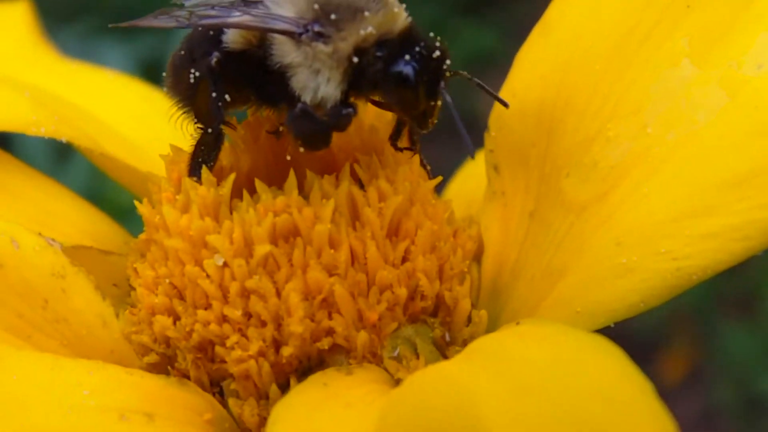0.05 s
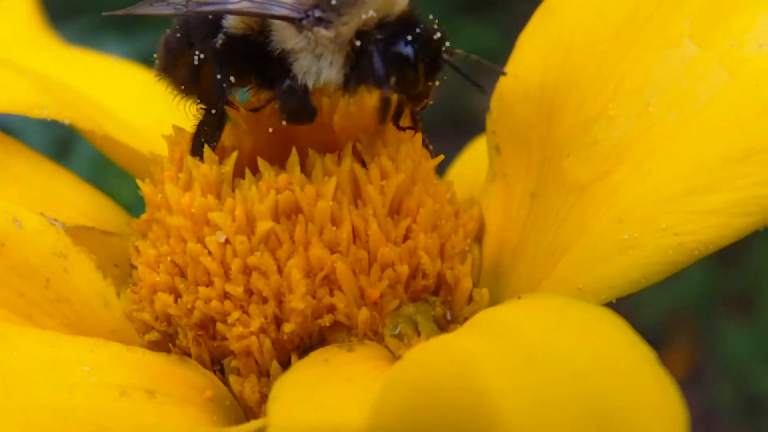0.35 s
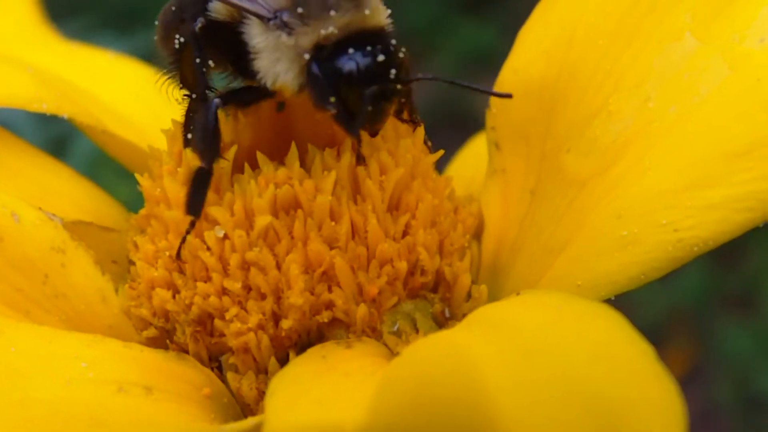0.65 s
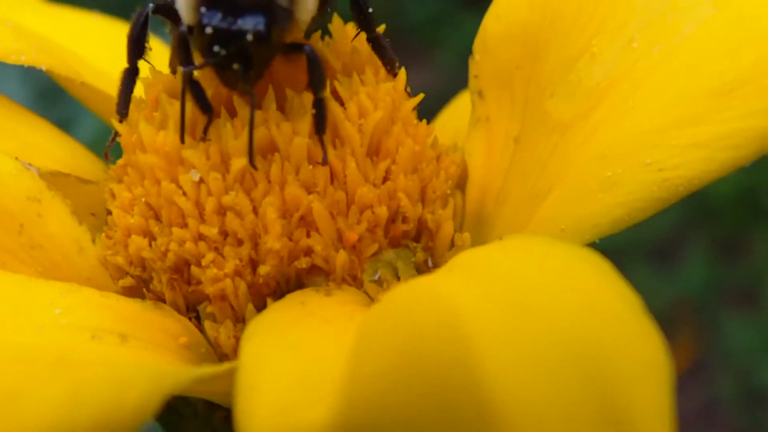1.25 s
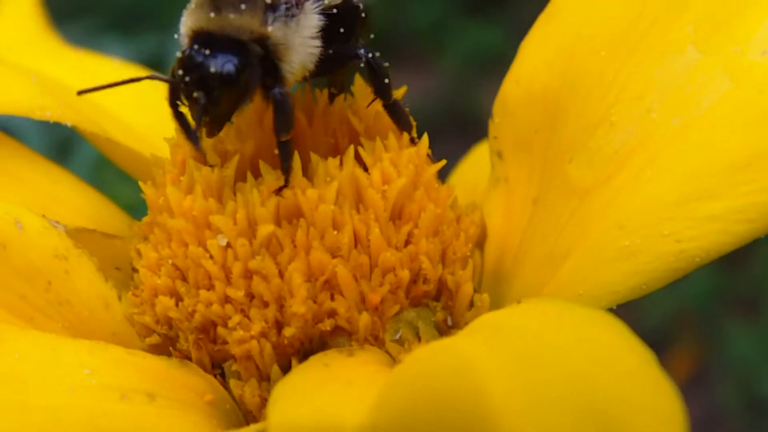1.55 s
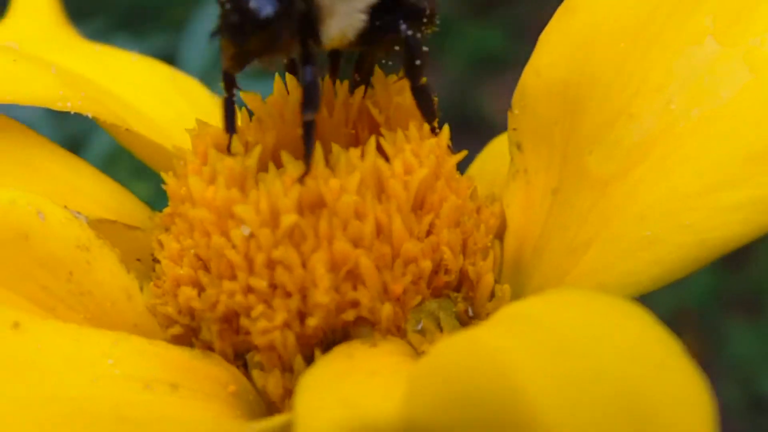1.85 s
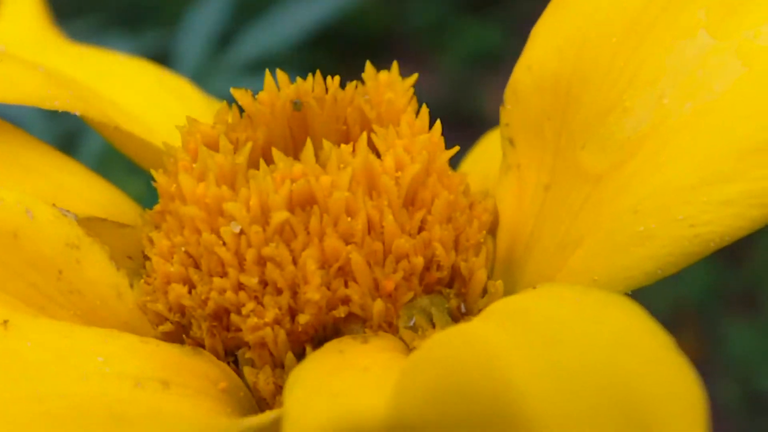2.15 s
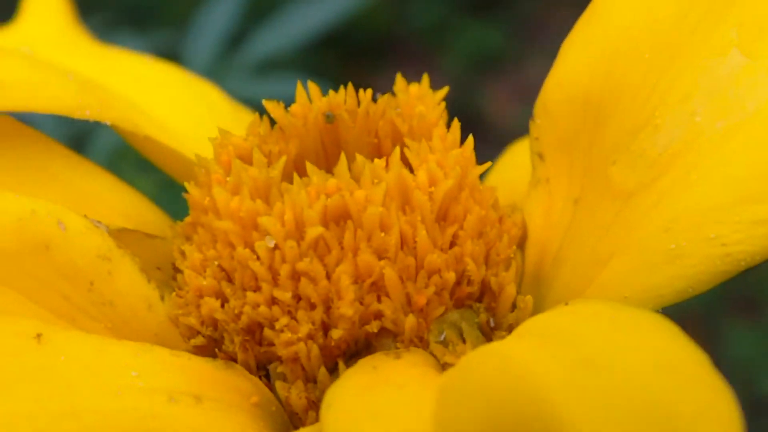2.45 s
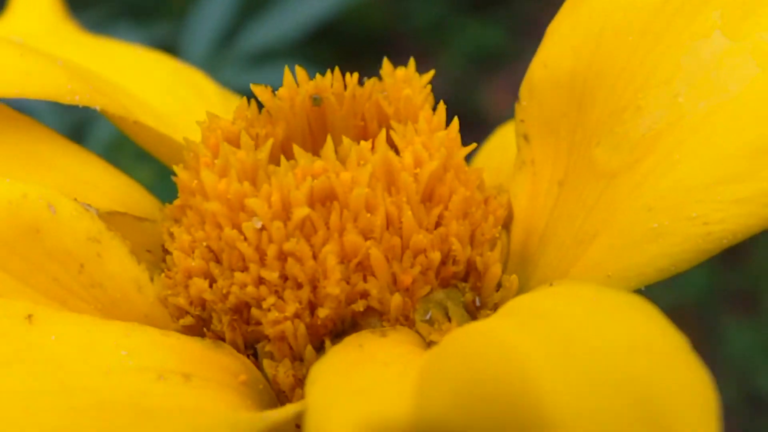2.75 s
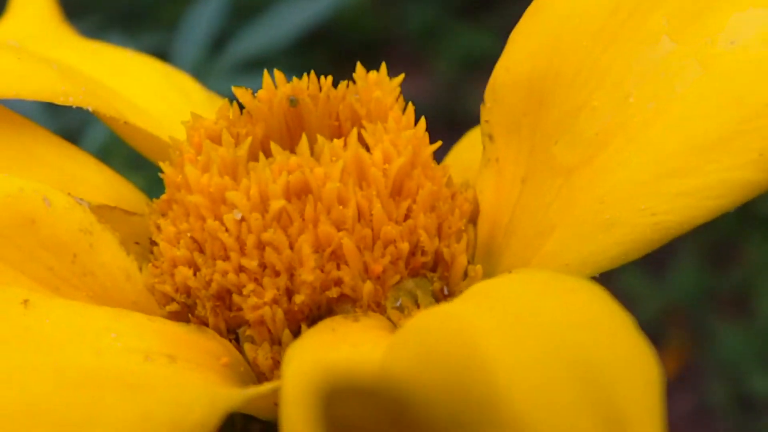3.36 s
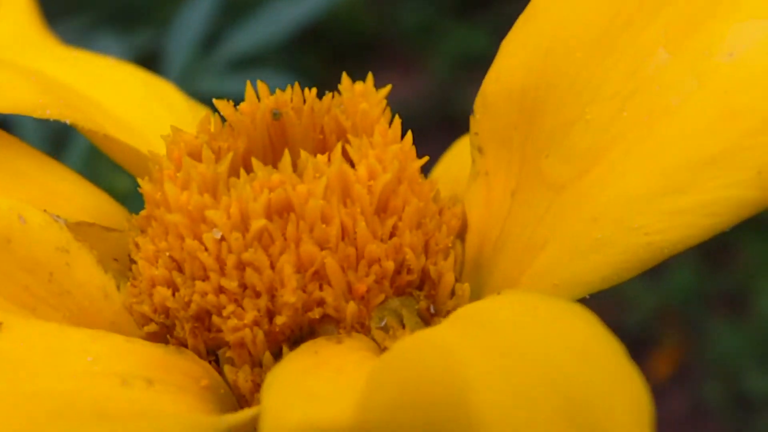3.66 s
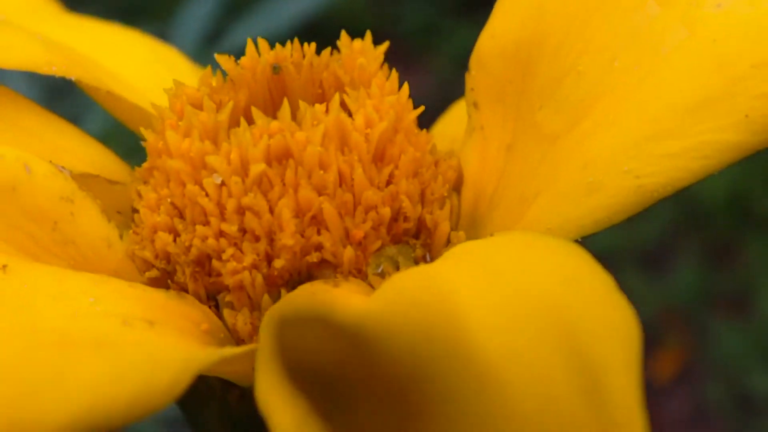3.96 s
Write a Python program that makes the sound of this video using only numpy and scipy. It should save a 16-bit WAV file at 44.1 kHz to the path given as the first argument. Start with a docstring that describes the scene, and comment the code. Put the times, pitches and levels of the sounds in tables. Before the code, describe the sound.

A bumblebee buzzes faintly close to the microphone, taking off from a flower halfway through, drifting away and swinging back. Throughout, crickets trill in the meadow over a soft hiss, with high katydid rasps and tiny distant bird pips.

```python
"""A bumblebee takes off from a flower close to the microphone, drifts away and swings back.
Its wingbeats make the buzz, and every stroke throws off a puff of hiss and a sharp snap.
In the summer meadow behind it, crickets trill, two katydids scrape their wings in buzzes
and ticks, and a far bird pips. Under it all lie a soft outdoor wash, a distant machine's
hum and the faint whine of the camera."""
import sys
import numpy as np
from scipy import signal
from scipy.fft import rfft, irfft
from scipy.io import wavfile
from scipy.ndimage import uniform_filter1d

SR = 44100
rng = np.random.default_rng(int(sys.argv[2]) if len(sys.argv) > 2 else 0)


def pcm_store(signal):
    """Save signal as 16-bit PCM."""
    levels = np.round(np.clip(np.atleast_2d(signal), -1, 1) * 32767)
    wavfile.write(sys.argv[1], SR, levels.astype(np.int16).T)


N = 176400
T = np.arange(N) / SR
HZ = np.fft.rfftfreq(N, 1 / SR)

# The bee's wingbeat. Each row: time in seconds, beats per second.
WINGBEAT = [(2.02, 161), (2.07, 171.5), (2.114, 180.7), (2.21, 170.1), (2.32, 170.6), (2.39, 174.3),
            (2.52, 169.3), (2.6, 169.7), (2.68, 161.8), (2.8, 173.4), (2.87, 164.8), (3.04, 167.9),
            (3.3, 165.8), (3.69, 167.1), (3.85, 164.5), (3.93, 163.8), (4, 165.2)]
def bumblebee():
    """Close to the microphone, one wingbeat drives the buzz, the hiss and the snaps."""
    beat_hz = curve(WINGBEAT) * (1 + .007 * drift(rate=50.5))
    cycles = np.cumsum(beat_hz) / SR
    return wing_buzz(cycles) + wing_hiss(cycles) + wing_snaps(cycles)


# The buzz at the microphone. Each row: time in seconds, level in dB.
BUZZ_LEVEL = [(2.03, -75), (2.07, -56), (2.11, -45.5), (2.22, -46.5), (2.33, -52.5), (2.42, -47),
              (2.6, -44), (2.7, -46), (2.76, -47.5), (2.81, -56), (2.98, -56), (3.15, -64), (3.45, -65),
              (3.65, -60), (3.72, -52.5), (3.83, -45), (3.92, -41), (4, -42.5)]
# Its overtones. Each row: multiple, then relative dB at take-off, flying off and coming back.
OVERTONES = [(1, -19, -16, -14), (2, -9, -9.5, 0), (3, -7, -4.5, -1), (4, -4, -9, -5), (5, 0, 0, -3.5),
             (6, -2, -9, -3.5), (7, -9, -7, -3), (8, -7, -6, -5), (9, -1, -4, -7), (10, -8, -11, -8),
             (11, -6, -10, -10), (12, -8, -13, -13), (13, -7, -15, -15), (14, -10, -14, -13)]
# The bee's turns, in seconds: start and end of turning away, start and end of turning back.
HEADING_S = [2.2, 2.42, 3.0, 3.7]
def wing_buzz(cycles):
    """Overtones of the wingbeat, whose balance shifts as the bee turns."""
    tone, power = 0, 0
    for k, (_, start_db, away_db, back_db) in enumerate(OVERTONES, 1):
        gain = amp(np.interp(T, HEADING_S, [start_db, away_db, away_db, back_db]))
        wander_db = np.interp(k, [1, len(OVERTONES)], [1.5, 3.6]) * drift(rate=17)
        tone += gain * amp(wander_db) * np.sin(2 * np.pi * (k * cycles + rng.random()))
        power += gain ** 2 / 2
    airborne = T > BUZZ_LEVEL[0][0]
    return tone / np.sqrt(power) * amp(curve(BUZZ_LEVEL)) * airborne * pan(left_db=-1.55)


# Air off the wings, close up. Each row: time in seconds, level in dB.
HISS_LEVEL = [(1.98, -70), (2.05, -45), (2.2, -44), (2.33, -43), (2.45, -42), (2.68, -43), (2.8, -43),
              (3.0, -45), (3.25, -46.5), (3.7, -45), (3.92, -43), (4, -44)]
# Its colour. Each row: frequency in Hz, relative level in dB.
HISS_COLOUR = [(20, -29), (300, -16), (1200, -8), (2500, 0), (4000, 0.5), (6000, 0.5), (8500, 2.5),
               (10500, 2.5), (12500, -16.5), (15500, -25)]
# Left-right likeness of hiss and wash: nearly mono in the mids, wide in the treble.
# Each row: frequency in Hz, likeness from 0 to 1.
LIKENESS = [(30, .97), (500, .94), (900, .97), (1400, .997), (1900, .9999), (3200, .9999), (4000, .98),
            (5500, .9), (8500, .75), (10500, .35), (13000, .1)]
def wing_hiss(cycles):
    """Each stroke and back stroke pushes out a puff of air."""
    puffs = strokes(cycles, width=.094, back=1, lag=.61, bed=1)
    return noise(amp(spectrum(HISS_COLOUR)), spectrum(LIKENESS), puffs) * amp(curve(HISS_LEVEL))


# Wing snaps, left of centre. Each row: time in seconds, level in dB.
SNAP_LEVEL = [(2.0, -75), (2.15, -49), (2.45, -45.5), (2.56, -41.5), (2.7, -39), (2.78, -46), (3.2, -47),
              (3.75, -48.5), (3.92, -42), (4, -46)]
def wing_snaps(cycles):
    """A sharp snap on each beat, heard when the wings face the microphone."""
    treble = noise(bell(HZ, 11600, width=1700), alike=.21)
    snaps = strokes(cycles, width=.13, back=.3, lag=.48, bed=.11)
    return treble * snaps * amp(curve(SNAP_LEVEL)) * pan(left_db=2.5)


# The cricket chorus in the meadow. Each row: frequency in Hz, relative level in dB.
TRILL_COLOUR = [(5000, -100), (6500, -31), (6950, -17), (7250, -3), (7340, -8), (7430, -1), (7530, 1),
                (7650, 2), (7760, -12), (7880, -39), (8050, -17), (8500, -37), (9000, -100)]
# Clear notes of the nearest crickets. Each row: pitch in Hz, level in dB.
CRICKET_NOTES = [(7425, -47), (7642, -44.5)]
def crickets(trill_hz=45.1):
    """A shrill pulsing trill with clear notes in it, a little to the left."""
    cycles = np.cumsum(trill_hz * (1 + .0022 * drift(rate=2))) / SR
    pulses = strokes(cycles, width=.083, back=.43, lag=.28, bed=1)
    chorus = noise(amp(spectrum(TRILL_COLOUR)), alike=.79, pulse=pulses)
    chorus *= amp(-37 + .02 * drift(rate=17))
    notes = pulses * sum(amp(db) * wavering(hz, waver_hz=24) for hz, db in CRICKET_NOTES)
    return (chorus + notes) * pan(left_db=1.8)


# One cricket farther off. Each row: middle of the chirp in seconds, level in dB.
CHIRPS = [(.2, -47), (.47, -50), (.73, -49), (1.04, -47.5), (1.34, -46.5), (1.7, -47.5), (1.97, -48),
          (2.25, -50), (2.53, -49), (2.8, -49.5), (3.1, -48), (3.42, -48), (3.76, -48)]
def far_cricket():
    """Soft, regular chirps pitched below the chorus."""
    level = sum(amp(db) * bell(T, s, width=.09) for s, db in CHIRPS)
    return noise(bell(HZ, 6370, width=160), alike=.66) * level * pan(left_db=.6)


# Two katydids to the left: one buzzes loudly, another rasps faintly in its pause.
# Each row: start and end in seconds, level in dB, steady share between scrapes.
KATYDID_BUZZES = [(-.1, 0.271, -36.5, 1), (1.08, 1.73, -51.5, .05), (1.732, 4.1, -36.5, 0.79)]
# Ticks in that pause. Each row: time in seconds, peak level in dB.
KATYDID_TICKS = [(.54, -33), (.958, -33), (1.363, -33.5)]
# The colour of buzzes and ticks. Each row: frequency in Hz, relative level in dB.
KATYDID_COLOUR = [(6000, -100), (8500, -30), (9600, -16), (10400, -9), (10800, -5), (11050, -8),
                  (11300, -2), (11550, -9), (11850, 1), (12150, -4), (12450, 2), (12700, -4), (13100, -4),
                  (13550, 1), (13950, -6), (14400, 0), (14750, 1), (15100, -1), (15400, 0)]
def katydids(stroke_hz=46.7, tick_s=.0057, lead_s=.017):
    """Wing scrapes: fast runs make buzzes, single ones make two-part ticks."""
    level = 0
    for start, end, db, bed in KATYDID_BUZZES:
        gate = uniform_filter1d(1. * ((T > start) & (T < end)), size=150)
        level += amp(db) * gate * strokes(T * stroke_hz, width=.075, back=.37, lag=.37, bed=bed)
    for s, db in KATYDID_TICKS:
        opening = amp(-4) * bell(T, s - lead_s, tick_s / 3)
        level += amp(db) * (opening + bell(T, s, tick_s))
    return noise(amp(spectrum(KATYDID_COLOUR)), alike=.24) * level * pan(left_db=2.5)


# A bird far from the microphone. Each row: time in seconds, peak level in dB, pitch in Hz.
PIPS = [(.838, -52.5, 4330), (.932, -48.5, 4340), (1.84, -48.5, 4340), (1.893, -45, 4360),
        (2.472, -47.5, 4330), (2.926, -45.5, 4350), (3.351, -49.5, 4330), (3.41, -52, 4410)]
def far_bird(fall_hz_per_s=6200):
    """Tiny pips, each falling in pitch."""
    pips = 0
    for s, db, hz in PIPS:
        cycles = (T - s) * (hz - fall_hz_per_s * (T - s) / 2)
        pips += amp(db) * bell(T, s, width=.01) * np.sin(2 * np.pi * cycles)
    return pips


# The open air of the meadow. Each row: frequency in Hz, relative level in dB.
WASH_COLOUR = [(20, -37), (60, -35), (100, -28), (170, -25), (260, -15), (300, -18), (350, -6),
               (400, -18.5), (520, -13.5), (650, -8), (760, -7), (1050, -1), (1300, -1.5), (1570, 3),
               (1680, -0.5), (1800, 6), (1950, -2.5), (2080, 2), (2220, -1.5), (2700, -1.5), (3100, -3.5),
               (3600, -5), (4500, -6.5), (5700, -7.5), (9000, -10.5), (11500, -12), (15000, -5.5)]
def meadow_air():
    """A soft outdoor wash over a very faint rumble."""
    alike = spectrum(LIKENESS)
    wash = noise(amp(spectrum(WASH_COLOUR)), alike) * amp(-43 + .45 * drift(rate=9.6))
    rumble = amp(-92) * noise(bell(HZ, 0, width=75), alike)
    return wash + rumble


# A machine in the distance, then the camera close by. Each row: pitch in Hz, level in dB.
MACHINE_HUM = [(120, -85.5), (295, -79), (646, -64)]
CAMERA_WHINE = [(1814, -59), (2051, -63), (2342, -61.5), (2638, -63.5), (2697, -63.5), (2988, -63),
                (3047, -60.5), (3397, -70), (3515, -64), (4102, -63)]
def hum_and_whine():
    """Thin tones of machine and camera, wavering slightly in level and pitch."""
    return sum(amp(db + 1.5 * drift(rate=13)) * wavering(hz, waver_hz=2.5)
               for hz, db in MACHINE_HUM + CAMERA_WHINE)


def strokes(cycles, width, back, lag, bed):
    """Loudness over each wing cycle: a main stroke, a back stroke `lag` cycles later, a steady bed."""
    main, second = (bell((cycles - shift) % 1, .45, width) for shift in (0, lag))
    return unit(bed + main + back * second)


def noise(gain, alike, pulse=1):
    """Stereo noise of rms 1, pulsed and then coloured, with a given left-right likeness."""
    mid, side = rfft(rng.standard_normal((2, N)) * pulse)
    mid, side = mid * np.sqrt(1 + alike), side * np.sqrt(1 - alike)
    return unit(irfft(np.array([mid + side, mid - side]) * gain, N))


def wavering(hz, waver_hz):
    """A tone of rms 1 whose pitch wanders."""
    cycles = np.cumsum(hz + waver_hz * drift(rate=14.6)) / SR
    return np.sqrt(2) * np.sin(2 * np.pi * (cycles + rng.random()))


def drift(rate):
    """Random wander of rms 1, mostly slower than `rate` Hz."""
    return unit(irfft(rfft(rng.standard_normal(N)) * bell(HZ, 0, rate), N))


def curve(points):
    """Joins (seconds, value) points by straight lines."""
    return np.interp(T, *np.transpose(points))


def spectrum(points):
    """Joins (Hz, value) points on a log-frequency axis."""
    hz, value = np.transpose(points)
    return np.interp(np.log(HZ + 1), np.log(hz + 1), value)


def bell(x, centre, width):
    """A smooth bump of height 1."""
    return np.exp(-.5 * ((x - centre) / width) ** 2)


def pan(left_db):
    """Channel gains that put the left `left_db` above the right."""
    return amp(np.array([[left_db], [-left_db]]) / 2)


def amp(db):
    """Decibels to gain."""
    return 10 ** (np.asarray(db) / 20)


def unit(x):
    """Scales to rms 1."""
    return x / np.sqrt(np.mean(x ** 2) + 1e-20)


def scene():
    """The bee at the microphone, the meadow behind it."""
    insects = bumblebee() + crickets() + far_cricket() + katydids()
    return insects + far_bird() + meadow_air() + hum_and_whine()


def record(dry):
    """The recorder cuts off the highest treble."""
    lowpass = signal.firwin(1023, cutoff=15380, window=("kaiser", 9), fs=SR)
    return signal.oaconvolve(dry, lowpass[None], "same")


dry = scene()
out = record(dry)
pcm_store(out)
```